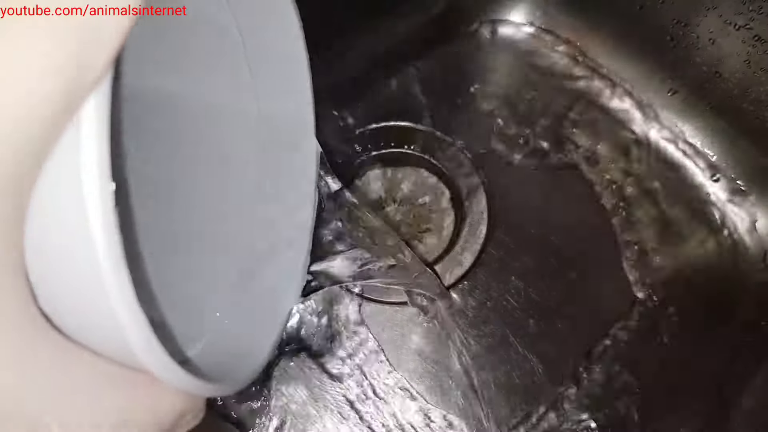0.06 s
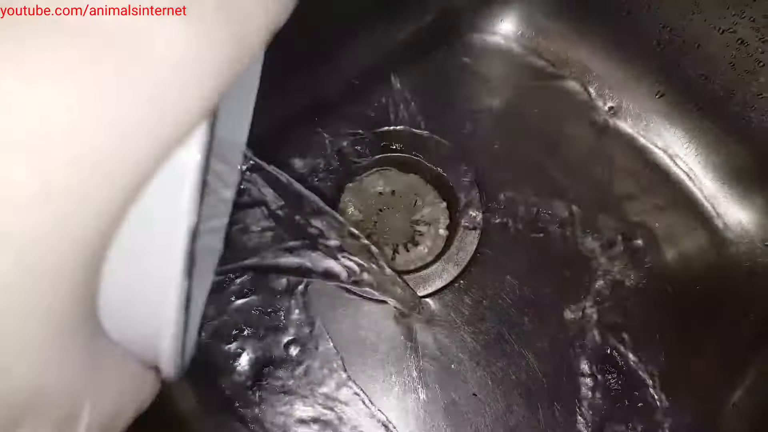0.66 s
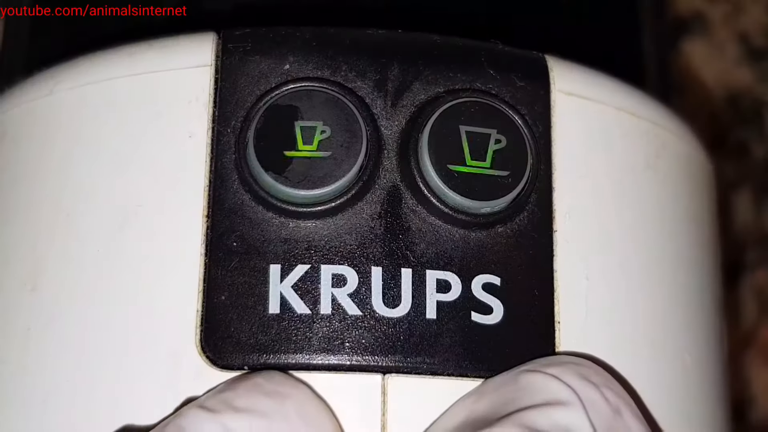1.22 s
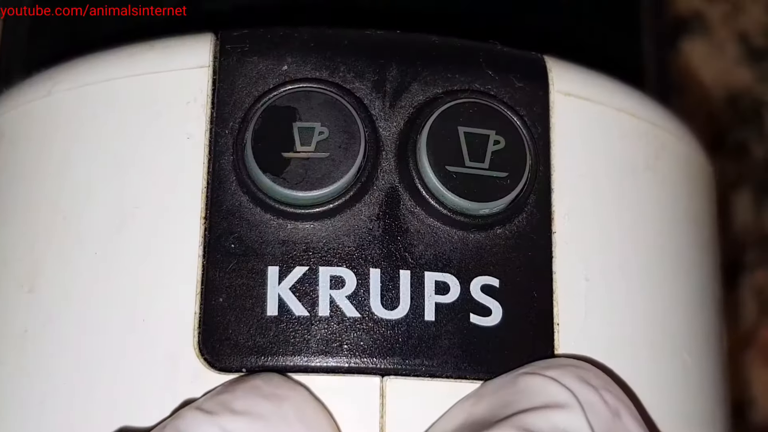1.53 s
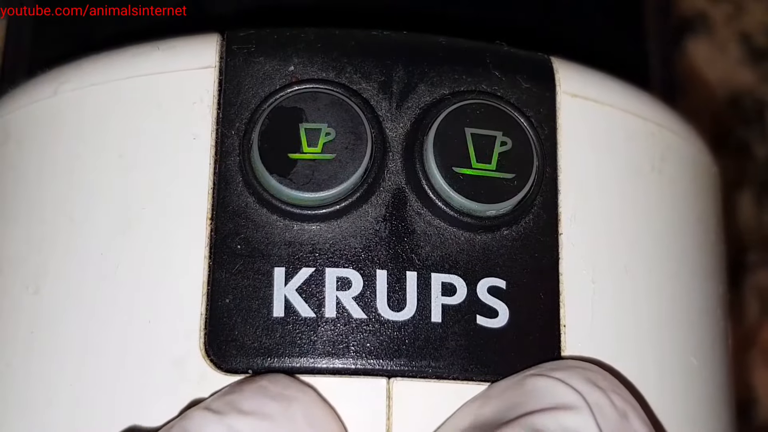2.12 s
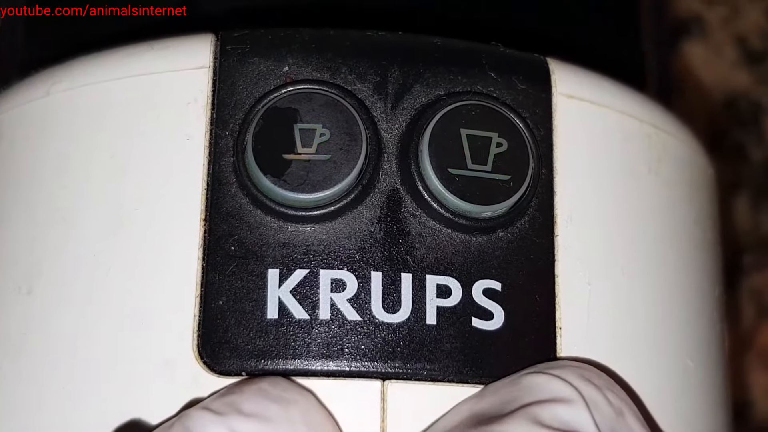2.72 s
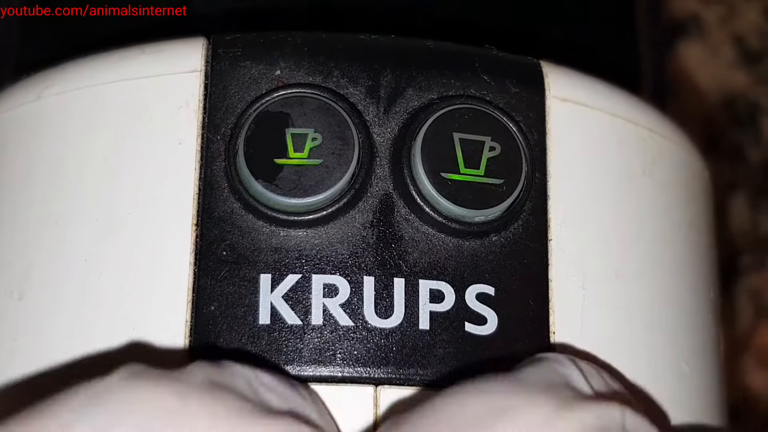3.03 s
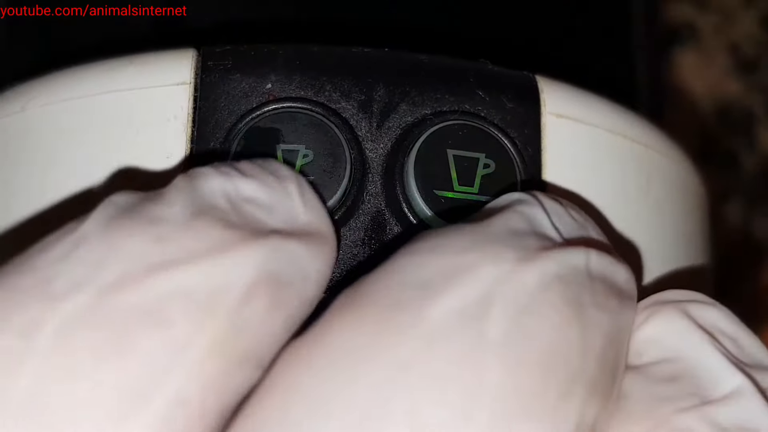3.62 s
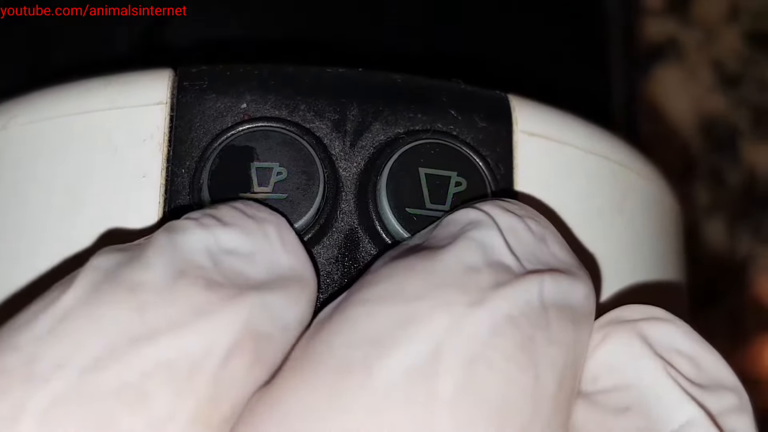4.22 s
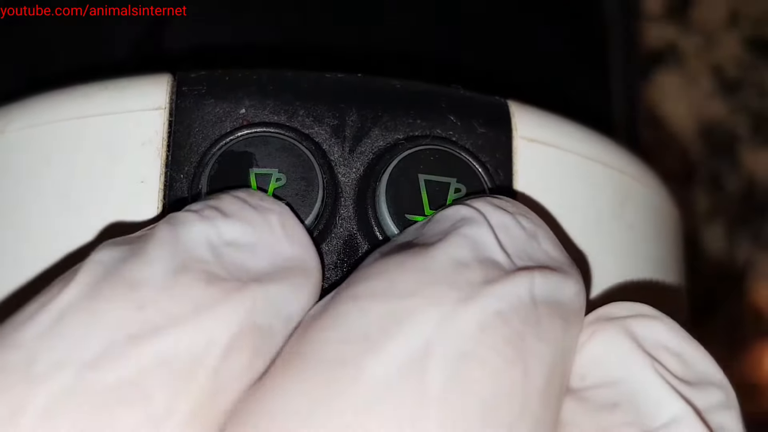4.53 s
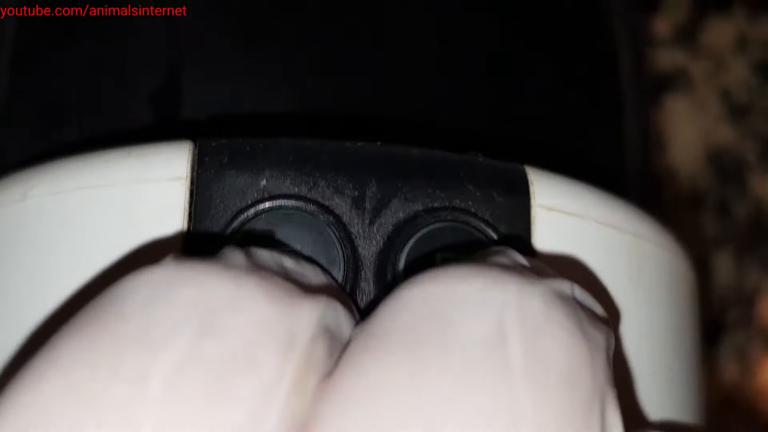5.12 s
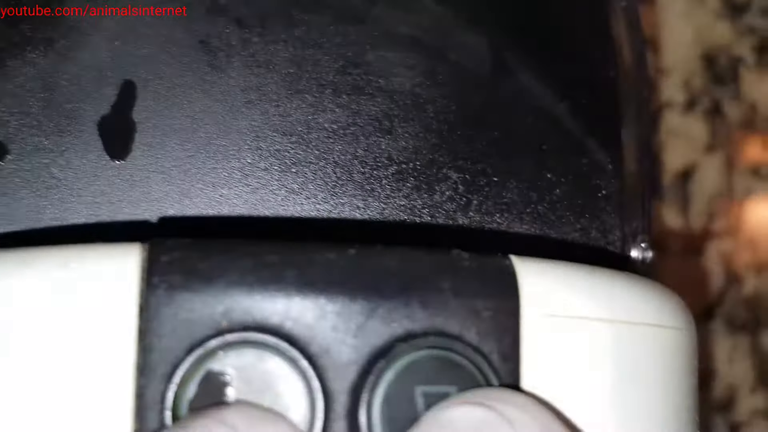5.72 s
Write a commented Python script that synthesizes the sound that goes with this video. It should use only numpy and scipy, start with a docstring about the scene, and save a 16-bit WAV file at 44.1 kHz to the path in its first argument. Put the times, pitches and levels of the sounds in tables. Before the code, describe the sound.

Water pours into a steel sink, then a coffee machine hums steadily while a thin dribble ticks and plinks.

```python
"""Water in a tiled kitchen, from two microphone positions. At the steel sink it is tipped from a plastic
tub: the basin drums, bubbles gurgle, spray fizzes and a few drops spatter. The sound drops out for a
moment and resumes at a coffee machine, where a soft wash gives way to a thin dribble that ticks and
plinks in the room. Behind both, off to the right and louder at the machine, a motor hums at twice the
mains frequency over a low, resonant whirr."""
import sys
import numpy as np
from scipy import signal
from scipy.fft import rfft, irfft, next_fast_len
from scipy.io import wavfile
from scipy.ndimage import map_coordinates

SR = 44100
rng = np.random.default_rng(int(sys.argv[2]) if len(sys.argv) > 2 else 0)


def output_pcm(signal):
    """Save a mono or channel-first signal as 16-bit PCM at the path in sys.argv[1].

    Samples are clipped to [-1, 1] before scaling.
    """
    pcm = np.clip(np.atleast_2d(signal).T, -1, 1) * 32767
    wavfile.write(sys.argv[1], SR, np.round(pcm).astype(np.int16))


N = 254016

# decay of the tiled room: (frequency [Hz], t60 [s])
ROOM_DECAY = [(300, 0.23), (4000, 0.15), (9000, 0.21), (15000, 0.085)]
# how alike the two microphone channels are: (frequency [Hz], correlation [0-1])
COHERENCE = [(30, 0.89), (60, 0.88), (130, 1), (260, 0.58), (450, 1), (720, 0.99), (900, 0.071),
             (2000, 0.42), (3200, 0.11), (6000, 0.058)]
# the machine stands to the right, so that channel leads: (frequency [Hz], phase lead [rad])
RIGHT_LEAD = [(120, 0.35), (200, 0.27), (450, 0.9), (750, 1.58), (1200, 2.44), (2400, 5.26), (4000, 5.9)]
# the hum comes and goes at the sink, louder and steadier at the machine: (time [s], level [dB])
HUM_LEVEL = [(0, -29.5), (.16, -26.5), (.27, -35), (.44, -30), (.7, -31), (.8, -33), (.92, -30),
             (1.2, -31.5), (1.5, -22), (2.4, -23), (3.3, -22.5), (4.1, -23), (4.8, -22.5), (5.4, -22.5),
             (5.52, -24.5), (5.65, -21)]
# the hum's partials: (harmonic [number], relative level [dB])
HUM_HARMONICS = [(1, 1.5), (2, -19), (3, -54), (8, -61)]
# spectrum of the moving air: (frequency [Hz], relative level [dB])
AIR_SPECTRUM = [(20, -37), (45, -8.5), (62, -8), (82, 3), (140, 1), (210, -2.5), (255, -8.5), (380, -7),
                (680, -18), (850, -15), (2000, -25.5), (4500, -33.5), (8000, -40.5), (15000, -36)]
# low, narrow resonant peaks in the motor's whirr and the room:
# (frequency [Hz], width [Hz], relative level [dB])
LOW_PEAKS = [(41.8, 6, -13), (72.5, 5.5, -16.5), (81.4, 3.4, -3), (129.7, 9.1, 3.5), (139.4, 3.6, -16),
             (159.8, 9.3, -1), (183.6, 12.4, -8), (213.9, 3.7, -4), (244.6, 5.7, -9.5), (295, 19, -9.5),
             (303.6, 18, -8.5), (339, 16, -7.5), (357.3, 11, -9), (393, 24, -14), (422, 35, -16),
             (494, 64, -15), (564, 44, -16.5), (601, 72, -14.5), (666, 102, -17.5)]
# hollow ringing of the housing: (frequency [Hz], width [Hz], relative level [dB])
HOUSING_MODES = [(1155, 75, 1.5), (1496, 55, -2.5), (1585, 84, -6.5), (1600, 65, -36), (1760, 32, -9),
                 (1965, 125, -8.5), (2102, 61, -7), (2290, 120, -14.5), (2503, 220, -10.5),
                 (2670, 130, -10.5), (3140, 700, -15.5), (3580, 120, -14.5), (3905, 220, -15)]
# spectrum of the soft wash: (frequency [Hz], relative level [dB])
WASH_SPECTRUM = [(700, -12), (2000, 5.5), (5000, -0.5), (8000, -9.5), (11500, 1), (15000, -24)]
# the stream surges twice and thins as the tub empties, in relative levels:
# (time [s], gurgle [dB], spray [dB], burble [dB], drumming [dB])
POUR_LEVELS = [(0, -41.5, -49, -57, -46), (.16, -43, -44.5, -53, -42), (.24, -43.5, -49, -50, -42),
               (.33, -38.5, -43.5, -60, -40), (.43, -40, -43.5, -55, -44.5), (.49, -45, -52, -50, -43),
               (.56, -47, -48.5, -54.5, -43.5), (.69, -48.5, -53, -55, -55), (.8, -45, -49, -46, -59),
               (.87, -46.5, -53, -47.5, -47), (.99, -47.5, -52.5, -56, -52), (1.05, -47.5, -46, -52, -57),
               (1.17, -70, -61, -56, -63), (1.22, -52, -51, -53, -44)]
# resonances of the steel basin: (frequency [Hz], width [Hz], relative level [dB])
BASIN_MODES = [(237, 63, -0.5), (338, 99, -6), (457, 78, -7.5), (710, 98, -10.5), (1000, 170, -11.5)]
# colour of the gurgling bubbles: (frequency [Hz], gain [dB])
GURGLE_COLOUR = [(200, -13.5), (450, -25), (800, -9), (1300, -7.5), (1650, -7.5), (2000, -0.5), (2700, 2),
                 (3800, 4), (4700, 4), (8000, -27)]
# colour of the fine spray: (frequency [Hz], gain [dB])
SPRAY_COLOUR = [(2000, -20), (4000, -6.5), (6500, 0), (8000, -2.5), (9500, 4), (12000, 9), (15500, 2)]
# large bubbles in the sink: (time [s], relative level [dB], pitch [Hz], t60 [s], left-right [dB])
LARGE_BUBBLES = [(0.039, -25, 3790, 0.0079, -1), (0.083, -32.5, 3360, .008, -5),
                 (0.117, -27, 4620, 0.0072, 0), (0.163, -30, 1690, 0.026, -10),
                 (0.272, -27.5, 614, 0.021, -1), (0.295, -32, 3660, 0.0088, -9),
                 (0.306, -34, 1920, .02, -7), (0.388, -37, 2000, .016, -3), (0.427, -28, 3880, 0.0074, -12),
                 (0.499, -34, 1690, 0.02, 0), (0.565, -31.5, 860, 0.034, -6),
                 (0.728, -27, 2960, 0.007, -14), (0.728, -28.5, 3900, 0.0065, -12),
                 (0.7345, -23.5, 2730, 0.0062, -16), (0.7358, -20, 3630, .009, -9),
                 (0.773, -32, 1630, 0.035, -5), (0.823, -37, 3570, .02, -10), (0.84, -34, 1510, 0.028, 1),
                 (0.911, -35.5, 1750, .025, -11), (0.928, -32, 1720, 0.031, -10),
                 (0.974, -35, 1760, 0.028, -7), (0.975, -31, 2550, 0.011, -11),
                 (1.033, -26, 780, 0.011, 0.5), (1.054, -39.5, 1340, 0.041, 3), (1.065, -33, 1560, .035, 1),
                 (1.166, -36.5, 2910, 0.013, -3.5), (1.229, -36, 2270, 0.027, -14)]
# the loudest drops bursting on a hard wet surface: (time [s], relative level [dB], ring pitch [Hz],
# ring gain [dB], treble tilt [dB/octave], t60 [s], left-right [dB])
LOUD_DROPS = [(0.0356, -36.5, 12200.0, 3.5, -0.5, 0.024, 7), (0.1096, -42, 5500.0, 0.0, 1, 0.015, 11),
              (0.2776, -44, 9300.0, 10.0, -6.0, 0.017, 10), (0.3276, -37, 5470, 11.0, 7.5, 0.037, 7),
              (0.4051, -37.5, 12100.0, 3, -2, 0.027, 5.0), (0.5012, -39.5, 9700.0, -1, -9.5, 0.055, 5),
              (0.5644, -38.5, 5800.0, 12, 7, 0.009, 6.0), (0.5758, -40, 5500.0, 10, 5, 0.008, -1.0),
              (0.6082, -32, 11640, 1.5, -3.5, 0.01, 2.5), (0.73, -35, 6000.0, 11.0, 7, 0.008, 4.5),
              (0.8588, -41.5, 5600.0, 12, 0.5, 0.021, -1), (0.9083, -44, 5500.0, -2, -5, 0.019, 3.0),
              (1.1273, -48.5, 5500.0, 2.0, -3, 0.008, 11), (1.217, -35.5, 13300.0, 7.5, 3, 0.02, 3),
              (1.4486, -38, 10800.0, 11.0, -3.0, 0.025, 0), (1.5531, -44, 12700.0, 2.0, 10.0, 0.052, -3.0),
              (1.5671, -43, 11400.0, 0, -5, 0.043, 1), (1.7144, -37, 14150, 3.0, 0, 0.058, -0.5),
              (1.7536, -33.5, 12700.0, -2, 0.5, 0.044, 0.0), (1.8605, -37, 12900.0, -0.5, -1.5, 0.018, 0),
              (1.8833, -33.0, 11800.0, -1, 3.5, 0.057, 0.0), (1.9042, -37.5, 13200.0, 3.0, -2, 0.062, -1),
              (1.9267, -37, 12300.0, 12, -0.5, 0.049, 0.0), (2.1146, -44.5, 12300.0, 1, 12, 0.055, -3.0),
              (2.1471, -37, 11200.0, 11.0, 1, 0.058, 1.5), (2.1577, -41, 12200.0, 2, -3, 0.05, -0.5),
              (2.2055, -43, 14500.0, 0.0, 3, 0.063, 0), (2.2361, -36.5, 11500.0, 8.0, 1.0, 0.053, 0),
              (2.2574, -40.5, 13400.0, 1.0, 3.5, 0.055, 0.0), (2.3347, -45.5, 11800.0, 5, 12, 0.055, -3.0),
              (2.357, -36.5, 11100.0, 12, 2, 0.06, 1.0), (2.3772, -35, 11600, 8.0, -3, 0.062, -1),
              (2.3975, -42, 12400.0, 0.0, -4, 0.056, -1.5), (2.4169, -44.0, 8000.0, 0, -2.0, 0.059, 1.0),
              (2.4635, -46, 8000.0, -2, -3.0, 0.069, 3), (2.496, -43, 11000.0, 0.0, -5, 0.07, 0),
              (2.5168, -37.5, 12000.0, 5.0, -0.5, 0.056, 1.0), (2.6127, -37, 9200.0, 5, -5.0, 0.052, 1),
              (2.6458, -41.5, 14300.0, 5.0, -4, 0.057, -1.5), (2.665, -41.5, 8600.0, 4.0, -5.0, 0.056, 1.0),
              (2.6886, -44, 11300.0, 5, -8, 0.059, 3), (2.7143, -34, 9500, 10, -2.5, 0.042, 2),
              (2.7559, -46, 7400.0, 5.0, 7.0, 0.065, 2.0), (2.8262, -39, 11000.0, 6, -3.5, 0.061, 1),
              (2.8847, -41, 8900.0, 7, -3.5, 0.051, 0), (2.9238, -41.0, 7900.0, 8, 0, 0.061, 2),
              (2.9758, -42.5, 13800.0, -1, 6, 0.059, -1), (3.0056, -44, 14500.0, -1, 10.0, 0.06, -2),
              (3.0246, -37.0, 13700.0, -1, 1, 0.036, 1), (3.0846, -38, 9200.0, 11, -2.5, 0.05, 1.0),
              (3.148, -50.5, 12500.0, -1, 0.0, 0.04, 1), (3.2073, -34, 12400.0, 11.0, -1.5, 0.068, -3),
              (3.217, -39.0, 13700.0, -1, 0, 0.048, 4.0), (3.2468, -43.5, 7700.0, 1, 1, 0.056, 1),
              (3.2846, -38, 8650, 10, -4.0, 0.051, 0.0), (3.3746, -40.0, 7600.0, 8.0, 1, 0.044, 0.5),
              (3.4561, -46.0, 12900.0, 0.0, 8.0, 0.064, -2.0), (3.4681, -46, 7700.0, 6.0, -5, 0.046, 1.0),
              (3.4957, -42.5, 8100.0, 10, -3, 0.046, 1), (3.548, -47.5, 12500.0, 0.0, 2.0, 0.05, 2),
              (3.5939, -44.5, 12700.0, 0.0, 10.0, 0.058, 0.0),
              (3.6774, -46.5, 11500.0, 0.5, -1, 0.035, 0.0), (3.7627, -46.5, 12700.0, 4, 12, 0.055, -1.0),
              (3.7831, -39, 8700.0, 8, -6.0, 0.054, 1), (3.917, -47.5, 12300.0, 0.0, 6, 0.033, -3),
              (3.9673, -42.5, 6800.0, 12.5, 9.5, 0.069, 0), (3.9945, -46.5, 13400.0, 3.0, -8, 0.045, -1.0),
              (4.0586, -46.0, 7300.0, 0.0, 3, 0.065, 0), (4.0827, -34, 10800.0, 8.0, -2.5, 0.049, 0.5),
              (4.1053, -42.5, 7400.0, 11.0, 3, 0.059, 0.5), (4.1568, -35.5, 11500.0, 12, -4.0, 0.039, 1),
              (4.2022, -45, 12700.0, 1.0, -9, 0.069, -1.0), (4.227, -43.5, 11700.0, 0.0, -3, 0.052, 0.0),
              (4.2452, -46, 14100.0, 1, 4, 0.033, 0.5), (4.3675, -43, 11800.0, 0.0, -3.0, 0.045, -0.5),
              (4.4211, -36.5, 13500.0, 0, -1, 0.077, 0.0), (4.4568, -43.0, 11400.0, -1, -3.5, 0.058, 1.0),
              (4.617, -48, 13500.0, 3.0, 7, 0.03, -1), (4.628, -38, 11900.0, 6.0, 1, 0.065, -0.5),
              (4.6383, -33.5, 11300.0, 9, 2, 0.022, 3.0), (4.6765, -46, 12500.0, 0.0, 12, 0.055, 0.0),
              (4.728, -49.5, 12500.0, 0.5, 3.5, 0.027, 2), (4.8032, -43, 12000.0, 0.0, 11, 0.051, -1.5),
              (4.8354, -39, 9300, 11.5, -4, 0.044, 1.5), (4.8859, -46, 11600.0, 0.0, 1.5, 0.058, 1.5),
              (4.9668, -43.5, 7300.0, 7.0, -3, 0.058, -0.5), (4.9783, -41, 12900.0, 2.5, -1.0, 0.062, -1.0),
              (4.9878, -38, 12300.0, 7.0, -2.0, 0.048, -1), (5.044, -35.5, 12500.0, -2, 2.5, 0.038, -1.0),
              (5.066, -44, 14100.0, 3.0, -1, 0.051, 2), (5.1337, -41.0, 10600.0, -2, -4, 0.058, 2),
              (5.1734, -41.5, 12400.0, 0.5, 11, 0.065, -0.5),
              (5.1958, -37.5, 11300.0, 0.0, 12, 0.054, -0.5), (5.2269, -43.5, 12300.0, 0.0, 0.5, 0.057, 2),
              (5.2774, -41.5, 11800.0, 5.0, -1.5, 0.052, 0), (5.425, -45, 6300.0, 12, 7.0, 0.052, -1.5),
              (5.4467, -34, 12100.0, 12, -0.5, 0.049, 1), (5.4613, -42.5, 11100.0, 1.0, -4, 0.054, 0.5),
              (5.5626, -40.5, 6500.0, 12, -6, 0.039, -1.5), (5.5848, -44.0, 6500.0, 13, 9.0, 0.057, 0),
              (5.6746, -31, 11100, -2.5, 6.5, 0.035, -1), (5.7259, -39.5, 12300.0, -1, -3.5, 0.072, 2),
              (5.7489, -40.5, 11900.0, -1, -3, 0.054, 1)]
# spectrum of a bursting drop: (frequency [Hz], relative level [dB])
DROP_SPECTRUM = [(1500, -38), (4000, -7.5), (5300, -6.5), (6700, -3), (8000, -3), (9000, 0), (11300, 1),
                 (13800, -0.5), (15500, -2.5)]
# the drop-out between the two positions: (time [s], gain [dB])
DROPOUT = [(1.2, 0), (1.225, -7.5), (1.248, -18), (1.258, -50.5), (1.35, -36), (1.405, -30), (1.43, -17),
           (1.46, -5.5), (1.51, -1.5)]
# treble notch of the microphone port: (frequency [Hz], gain [dB])
MIC_PORT = [(7100, 1), (7950, -7), (8800, -2)]

CUT_S, TOP_HZ = 1.26, 15600  # the move from sink to machine; the band limit
HUM_HZ, WHINE_HZ = 100, 759
SWELL_DB, SWELL_PERIOD_S, SWELL_CREST_S = 0.8, 0.488, 2.376  # the hum swells and ebbs
WASH_S, WASH_ATTACK_S, WASH_HOLD_S, WASH_DB, WASH_FALL_DB_PER_S = 1.318, 0.16, 0.051, -42.5, 75
DROP_ATTACK_S, BURST_T60_S, RING_WIDTH_HZ, TILT_FROM_HZ = 0.003, 0.031, 1350, 6500
FAINT_DROPS_PER_S = 30
TIME = np.arange(N) / SR


def amp(db):
    """Decibels to gain."""
    return 10 ** (np.asarray(db) / 20)


def unit(x):
    """Scale to rms 1."""
    return x / np.sqrt(np.mean(x ** 2) + 1e-20)


def along(points, hz):
    """(frequency [Hz], value) points read on a log axis."""
    freqs, values = np.transpose(points)
    return np.interp(np.log(hz + 1), np.log(freqs), values)


def curves(rows):
    """One value per sample for each column after the time."""
    times, *columns = np.transpose(rows)
    return [np.interp(TIME, times, column) for column in columns]


def by_position(at_sink, at_machine):
    """One value per sample, for wherever the microphone stands."""
    return np.where(TIME < CUT_S, at_sink, at_machine)


def wobble(rate):
    """A smooth random curve, rate knots a second."""
    return map_coordinates(rng.standard_normal(int(N * rate / SR) + 4), [TIME * rate])


def filtered(x, response):
    """Filter x by a function of frequency."""
    size = x.shape[-1]
    padded = next_fast_len(size + 8192)
    return irfft(rfft(x, padded) * response(np.fft.rfftfreq(padded, 1 / SR)), padded)[..., :size]


def shape(points):
    """The response through (frequency [Hz], gain [dB]) points."""
    return lambda hz: amp(along(points, hz))


def resonances(modes):
    """The joint magnitude response of modes with steep skirts."""
    def mode(hz, centre, width, db):
        return amp(db) * np.abs(hz * width / (centre ** 2 - hz ** 2 + 1j * hz * width)) ** 2
    return lambda hz: np.sqrt(sum(mode(hz, *row) ** 2 for row in modes))


def panned(pan_db):
    """Left and right gains, pan_db apart; positive is left."""
    return amp(np.vstack([pan_db / 2, -pan_db / 2]))


def add(track, s, sound):
    """Mix a short stereo sound in at time s."""
    part = track[:, round(s * SR):][:, :sound.shape[-1]]
    part += sound[:, :part.shape[-1]]


def rush(response):
    """Noise of rms 1 from the right: alike in both channels in the bass, diffuse in the treble."""
    def mid_and_side(hz):
        angle = np.arccos(np.clip(along(COHERENCE, hz), -1, 1)) / 2
        return response(hz) * np.array([np.cos(angle), np.sin(angle)])
    mid, side = filtered(rng.standard_normal((2, N)), mid_and_side)
    lead = lambda hz: np.exp(1j * along(RIGHT_LEAD, hz) * np.array([[-.5], [.5]]))
    return unit(filtered(np.array([mid + side, mid - side]), lead))


def tiled_room(x):
    """The short reverberation off the tiles; the highest treble dies first."""
    hz, t, noise = signal.stft(rng.standard_normal((2, SR // 2)), SR, nperseg=256)
    tail = signal.istft(noise * amp(-60 * t / along(ROOM_DECAY, hz)[:, None]), SR, nperseg=256)[1]
    return signal.fftconvolve(x, tail / np.linalg.norm(tail[0]), axes=1)[:, :N]


def motor_hum():
    """A mains-locked hum that swells slowly and wavers at random, more so from the sink."""
    swell_db = SWELL_DB * np.cos(2 * np.pi * (TIME - SWELL_CREST_S) / SWELL_PERIOD_S)
    waver_db = by_position(1, 0.65) * wobble(20)
    phase = 2 * np.pi * HUM_HZ * TIME + 0.029 * wobble(13)
    hum = sum(amp(db) * np.sin(k * phase + rng.uniform(0, 2 * np.pi)) for k, db in HUM_HARMONICS)
    level_db = curves(HUM_LEVEL)[0] + swell_db + waver_db
    return amp(level_db) * unit(hum) * panned(by_position(-2.5, -1.13))


def motor_whirr():
    """A whirr of air with low, narrow peaks, a hollow ring from the housing and a faint whine."""
    air = amp(by_position(-39, -35)) * rush(shape(AIR_SPECTRUM)) * panned(-0.43)
    peaks = amp(by_position(-43.5, -33.5)) * rush(resonances(LOW_PEAKS)) * panned(-1.5)
    housing = amp(by_position(-62.5, -50)) * rush(resonances(HOUSING_MODES)) * panned(-14.5)
    whine_db = by_position(-59.5, -54) + 1.5 * wobble(6.6)
    whine = amp(whine_db) * np.sin(2 * np.pi * WHINE_HZ * TIME + 0.65 * wobble(4))
    return air + peaks + housing + whine


def wash():
    """At the machine, a soft rush of water rises, holds briefly and dies away."""
    t = TIME - WASH_S
    rise = np.clip(t / WASH_ATTACK_S, 0, 1) ** 2
    fall_db = WASH_FALL_DB_PER_S * np.maximum(t - WASH_ATTACK_S - WASH_HOLD_S, 0)
    return rise * amp(WASH_DB - fall_db) * rush(shape(WASH_SPECTRUM))


def bubbles(count, centre_hz, spread, cycles, size_db):
    """A stereo swarm of small damped bubbles in the sink, of rms 1 until the cut."""
    t, span = np.arange(900) / SR, round(CUT_S * SR)
    start = rng.integers(0, span, count)
    hz = np.minimum(centre_hz * np.exp(spread * rng.standard_normal(count)), TOP_HZ)
    gain = amp(size_db * np.minimum(rng.exponential(1, count), 4))
    angle = rng.uniform(0, 2 * np.pi, count)[:, None]
    periods = hz[:, None] * t
    rings = gain[:, None] * np.sin(2 * np.pi * periods) * np.exp(-periods / cycles) * (1 - t / t[-1])
    where = (start[:, None] + np.arange(len(t))).ravel()
    swarm = [np.bincount(where, (rings * side).ravel(), span)[:span]
             for side in (np.cos(angle), np.sin(angle))]
    return np.pad(unit(np.array(swarm)), ((0, 0), (0, N - span)))


def glug(hz, t60, attack_s=0.0008, rise=0.05, scatter=0.045, walls_t60=0.042):
    """One large bubble with peak 1: its pitch climbs as it dies, and close walls smear it."""
    t = np.arange(SR // 12) / SR
    phase = 2 * np.pi * hz * t * (1 + rise * np.minimum(t / t60, 1))
    ring = np.sin(phase) * amp(-60 * t / t60) * (1 - np.exp(-t / attack_s))
    walls = rng.standard_normal((2, len(t))) * amp(-60 * t / walls_t60) * scatter
    walls[:, 0] += 1  # the direct path to the microphone
    sound = signal.fftconvolve(ring[None], walls, axes=1)[:, :len(t)]
    return sound / np.abs(sound).max()


def pour():
    """At the sink, water hits steel: the basin drums, bubbles gurgle, spray fizzes, the pool burbles."""
    slosh_db = 1.2 * wobble(19.5)
    gurgle_db, spray_db, burble_db, drum_db = curves(POUR_LEVELS) + slosh_db
    gurgle = bubbles(count=5500, centre_hz=2417, spread=0.637, cycles=6.7, size_db=0.5)
    spray = bubbles(count=5200, centre_hz=8070, spread=0.42, cycles=4.2, size_db=2.0)
    burble = bubbles(count=450, centre_hz=1707, spread=0.14, cycles=9, size_db=1.5)
    water = by_position(amp(drum_db), 0) * rush(resonances(BASIN_MODES))
    water += amp(gurgle_db - 2) * filtered(gurgle, shape(GURGLE_COLOUR)) * panned(-5.5)
    water += amp(spray_db) * filtered(spray, shape(SPRAY_COLOUR)) * panned(1.6)
    water += amp(burble_db) * burble * panned(-1)
    glugs = np.zeros((2, N))
    for s, db, hz, t60, pan_db in LARGE_BUBBLES:
        add(glugs, s, amp(db - 5) * panned(pan_db) * glug(hz, t60))
    return water + glugs + amp(-8) * tiled_room(water + amp(-3) * glugs)


def faint_drops():
    """Small drops at uneven intervals at the machine, in rows like LOUD_DROPS."""
    draws = rng.standard_normal((round(FAINT_DROPS_PER_S * (N / SR - CUT_S)), 4))
    rows = []
    for k, (jitter, size, pitch, side) in enumerate(draws, 1):
        s = CUT_S + (k + jitter / 2) / FAINT_DROPS_PER_S
        db = -57 + 6 * min(size, 1)
        hz = 12500 * 2 ** (0.15 * pitch)
        rows.append((s, db, hz, 2, 0, 0.03, 4.5 * side))
    return rows


def drop_envelope(t, t60):
    """A rounded rise and an exponential fall, with peak 1."""
    envelope = (1 - np.exp(-(t / DROP_ATTACK_S) ** 2)) * amp(-60 * t / t60)
    return envelope / envelope.max()


def dribble():
    """Drops tick and spatter, a few at the sink and most at the machine; trapped bubbles give pitch."""
    drops, t = np.zeros((2, N)), np.arange(SR // 12) / SR
    for s, db, hz, ring_db, tilt_db, t60, pan_db in np.vstack([LOUD_DROPS, faint_drops()]):
        droplets = rng.standard_normal((2, len(t)))
        droplets *= amp(4.5 * rng.standard_normal(len(t)))  # droplets of uneven size
        broad = lambda f: shape(DROP_SPECTRUM)(f) * amp(tilt_db * np.log2(np.maximum(f / TILT_FROM_HZ, 1)))
        pitched = lambda f: broad(f) * (0.5 + resonances([(hz, RING_WIDTH_HZ, ring_db)])(f))
        burst = amp(-8.5) * unit(filtered(droplets, broad)) * drop_envelope(t, BURST_T60_S)
        spatter = amp(-2) * unit(filtered(droplets, pitched)) * drop_envelope(t, t60)
        add(drops, s, amp(db) * panned(pan_db) * (burst + spatter))
    return drops + amp(-2) * tiled_room(drops)


def scene():
    """The motor behind, the water in front: first at the sink, then at the machine."""
    return motor_hum() + motor_whirr() + pour() + wash() + dribble()


def record(dry):
    """The sound drops out between positions; the microphone port colours it, up to the band limit."""
    faded = dry * amp(curves(DROPOUT)[0])
    return filtered(faded, lambda hz: shape(MIC_PORT)(hz) * (hz < TOP_HZ))


dry = scene()
out = record(dry)
output_pcm(out)
```